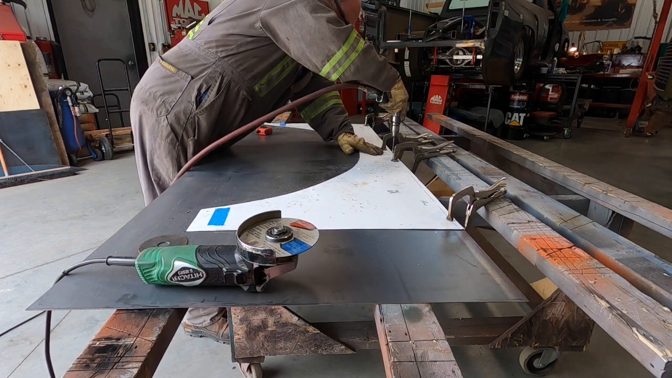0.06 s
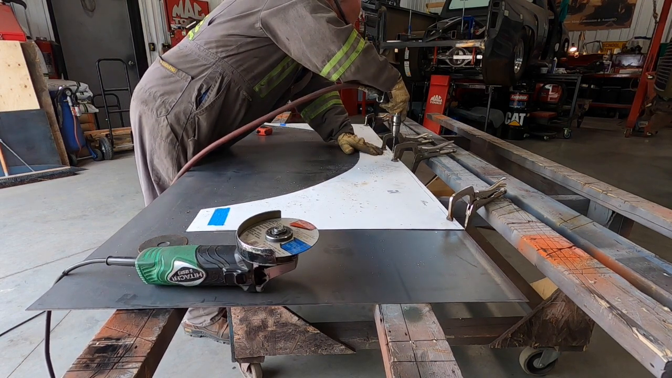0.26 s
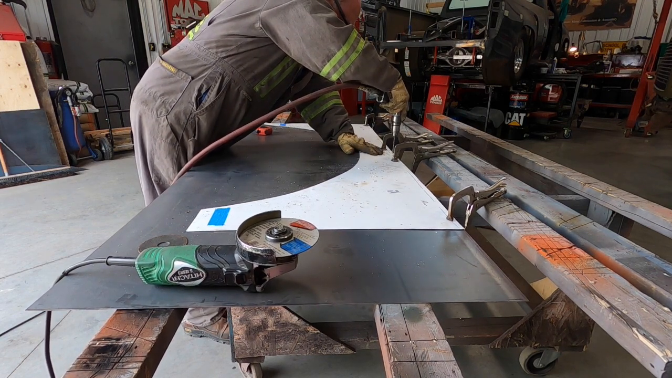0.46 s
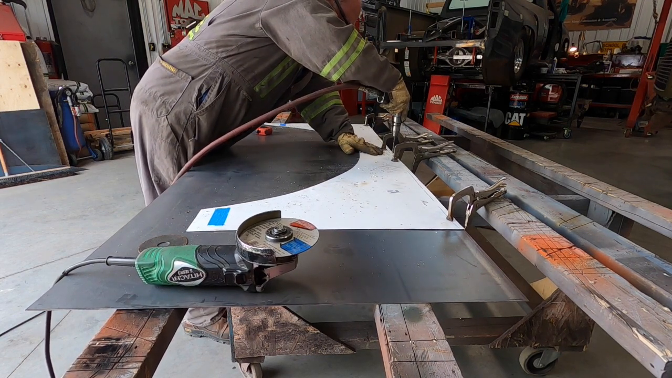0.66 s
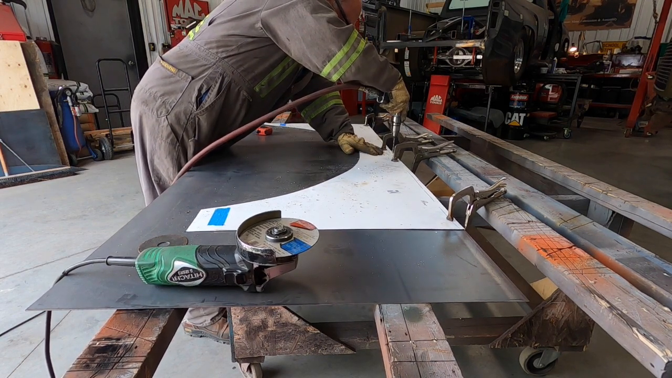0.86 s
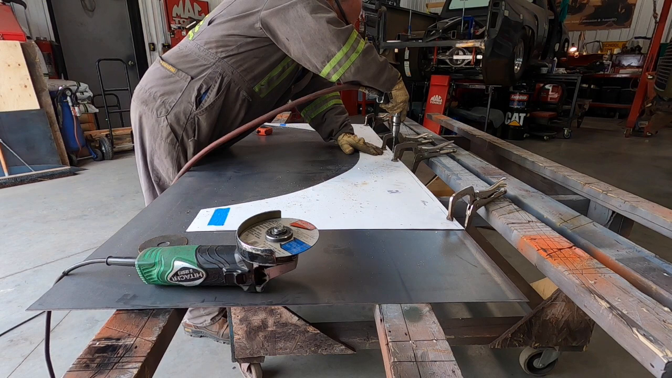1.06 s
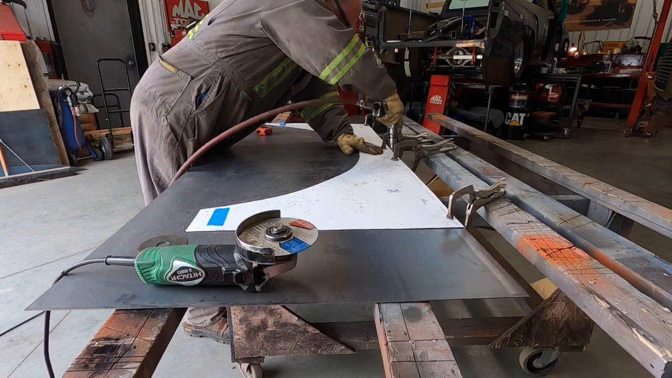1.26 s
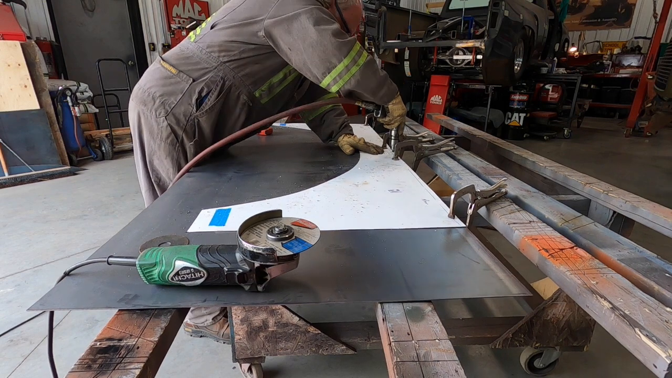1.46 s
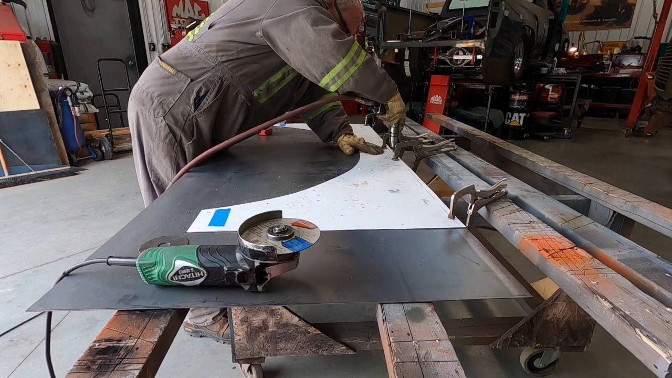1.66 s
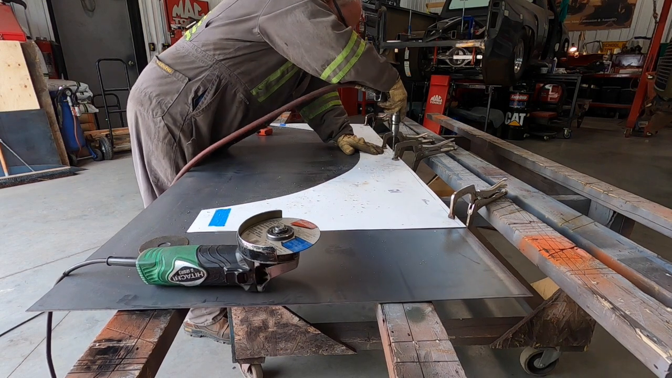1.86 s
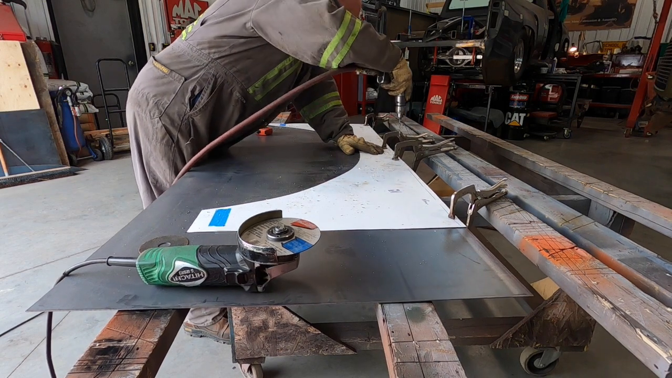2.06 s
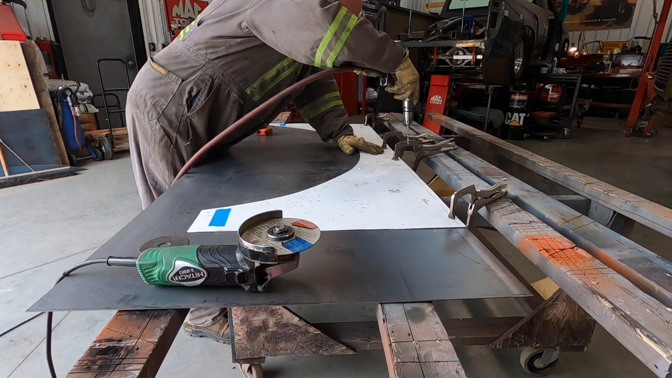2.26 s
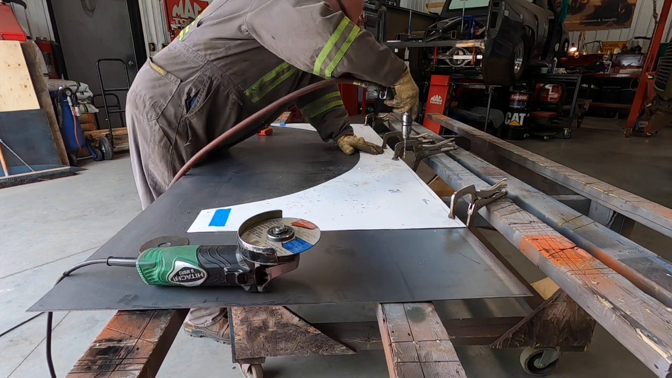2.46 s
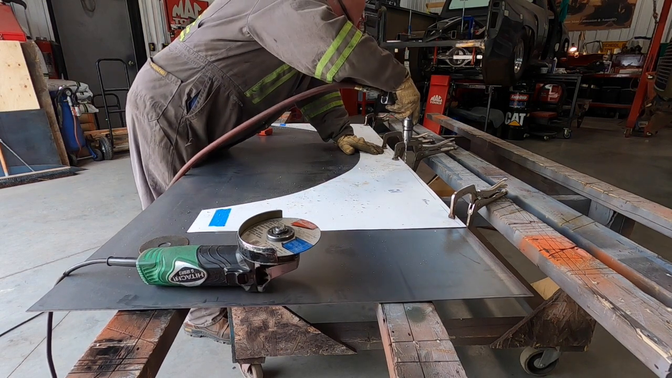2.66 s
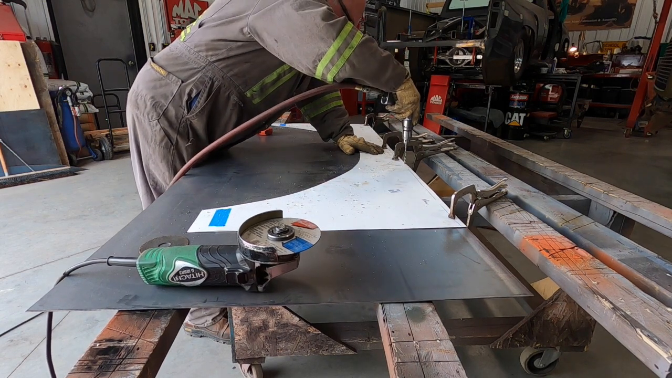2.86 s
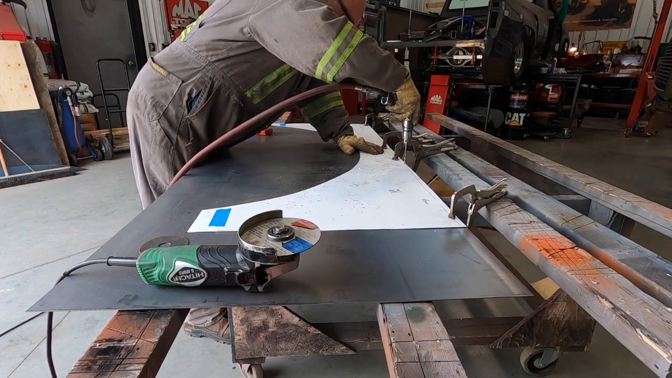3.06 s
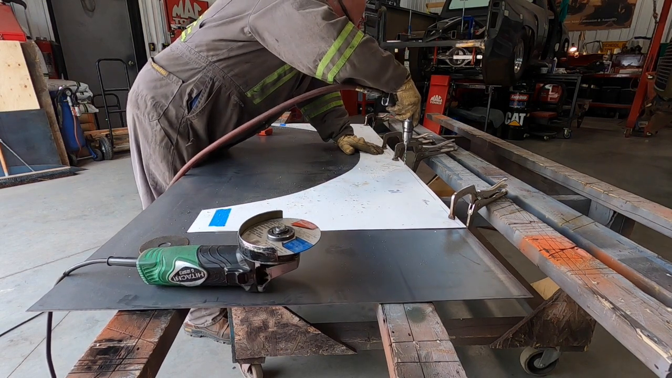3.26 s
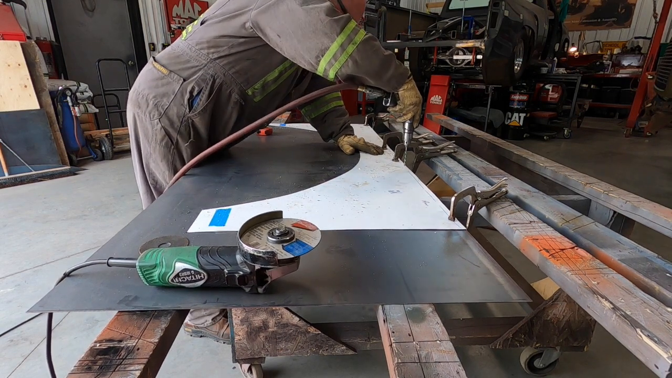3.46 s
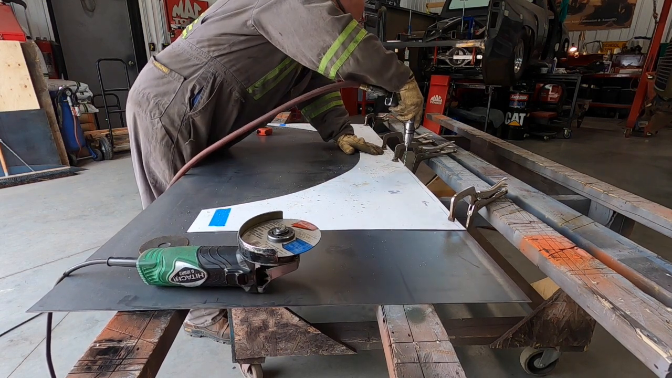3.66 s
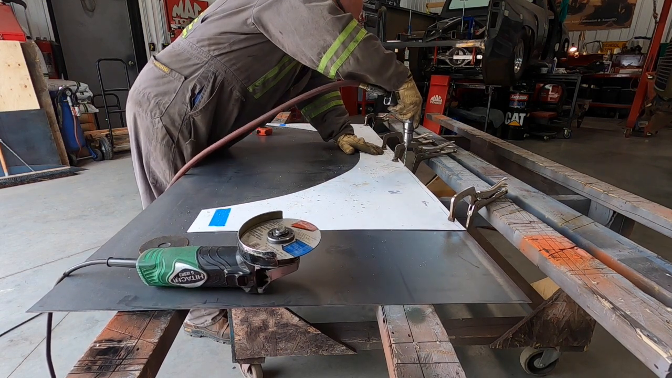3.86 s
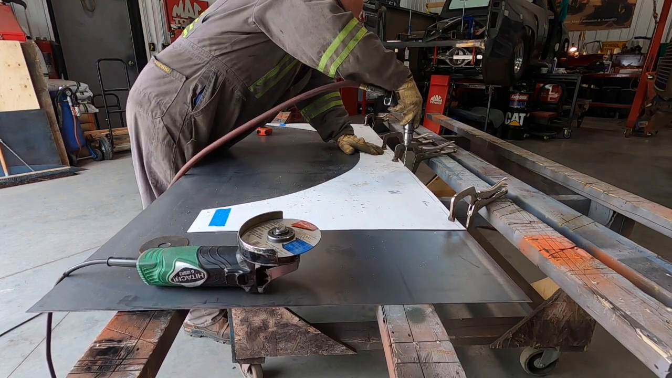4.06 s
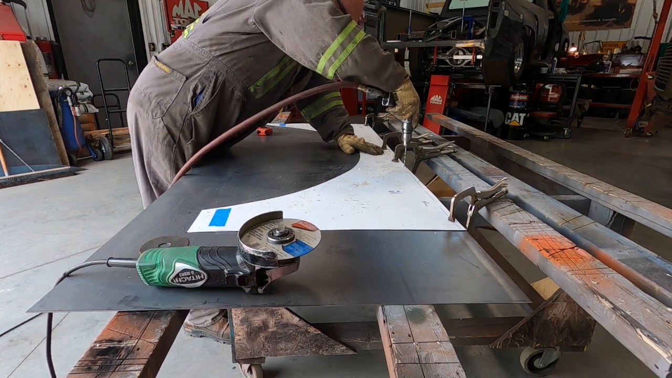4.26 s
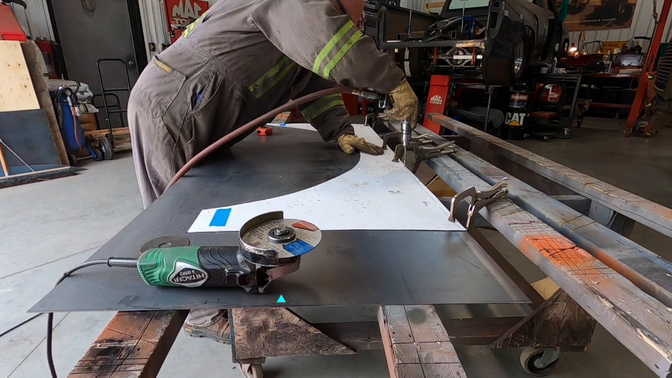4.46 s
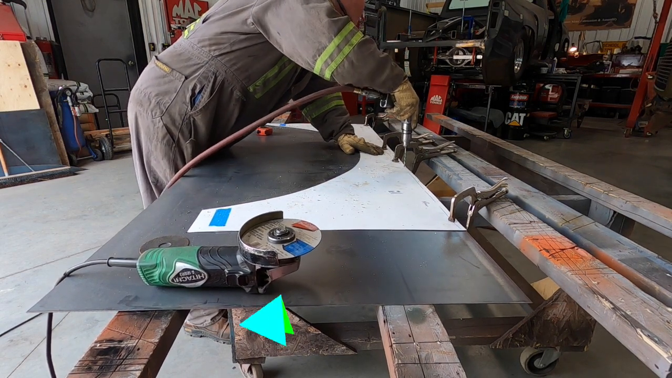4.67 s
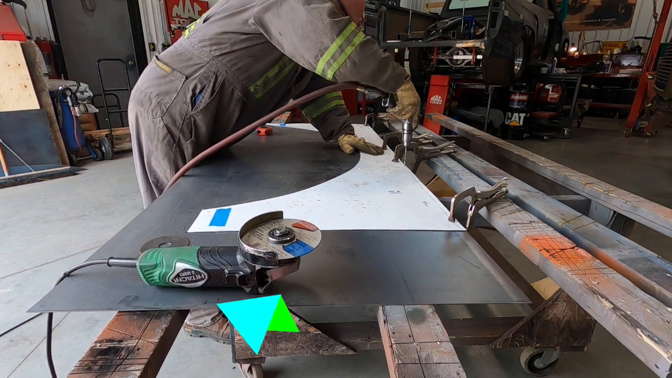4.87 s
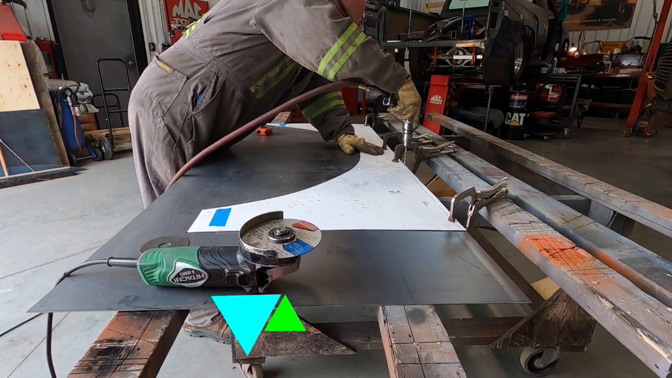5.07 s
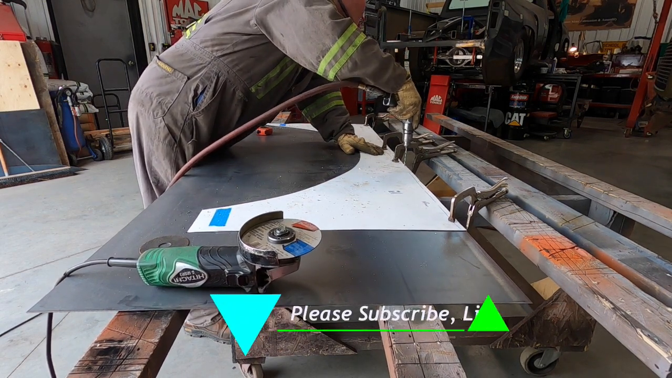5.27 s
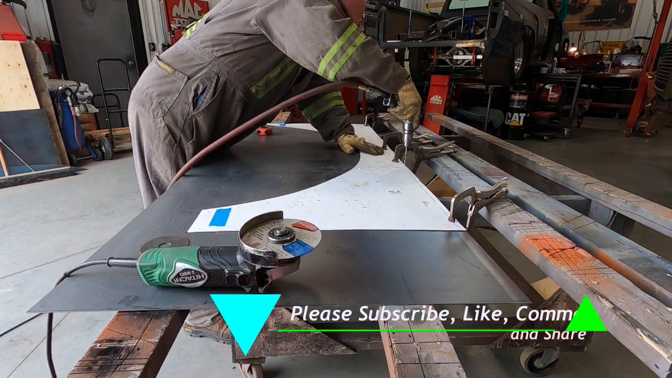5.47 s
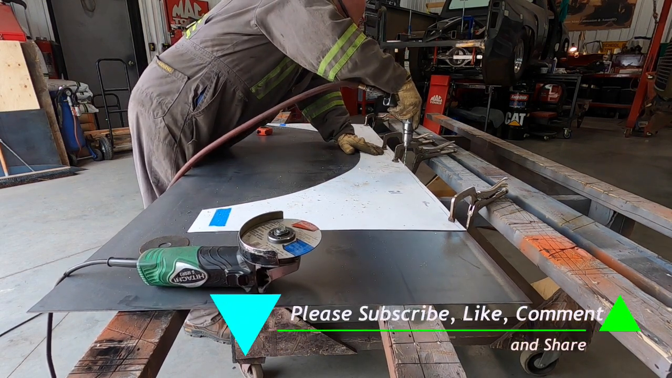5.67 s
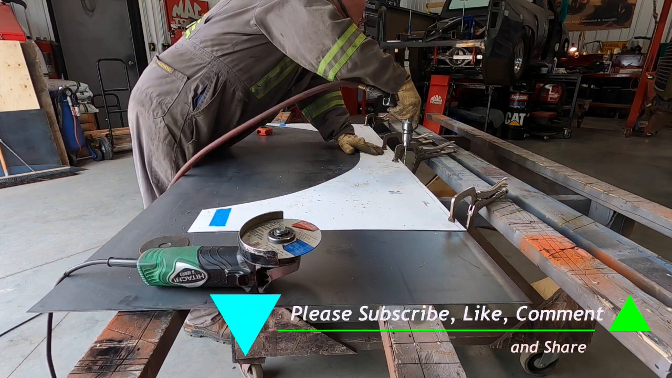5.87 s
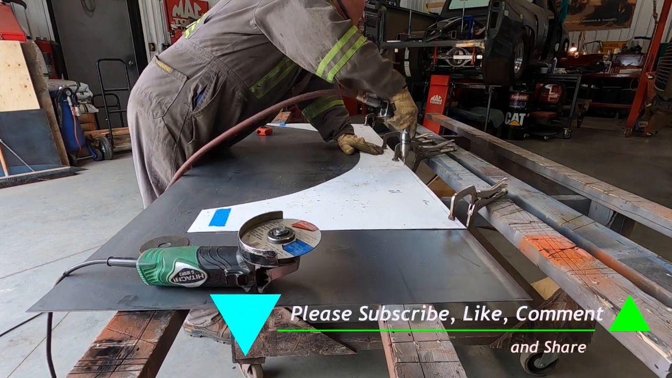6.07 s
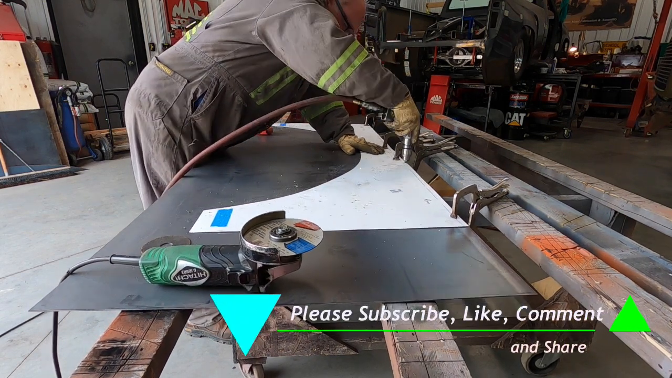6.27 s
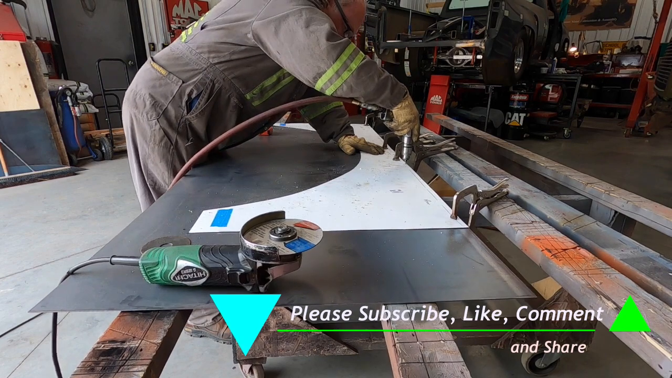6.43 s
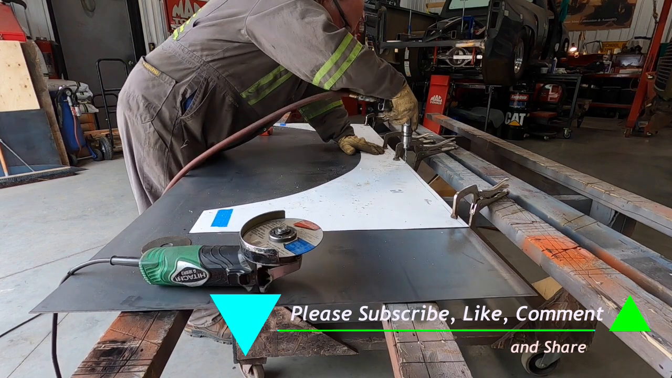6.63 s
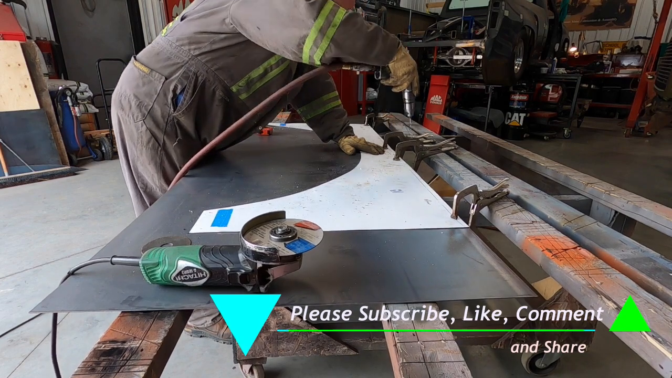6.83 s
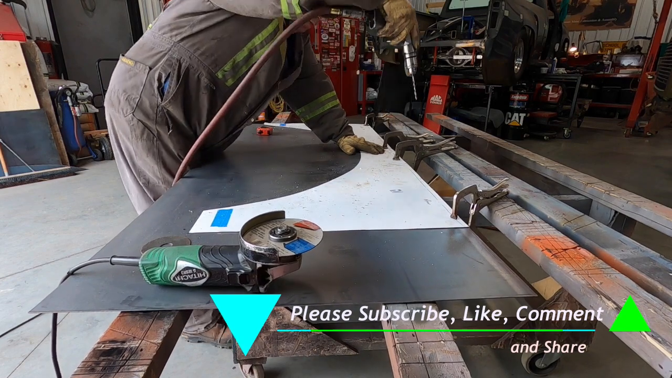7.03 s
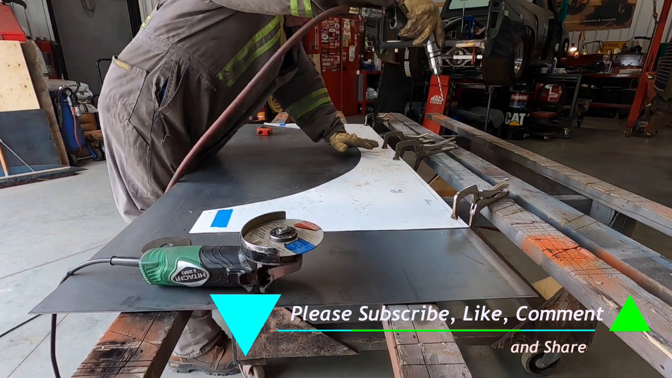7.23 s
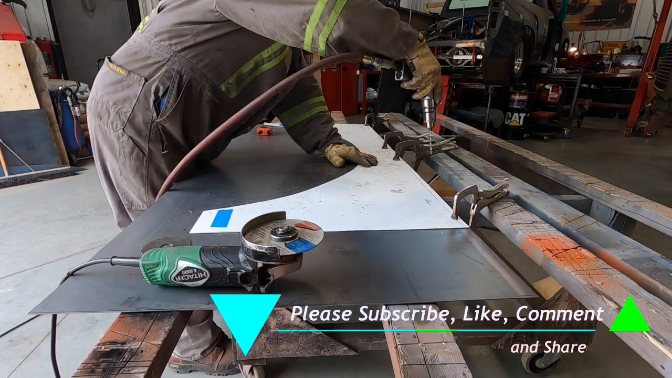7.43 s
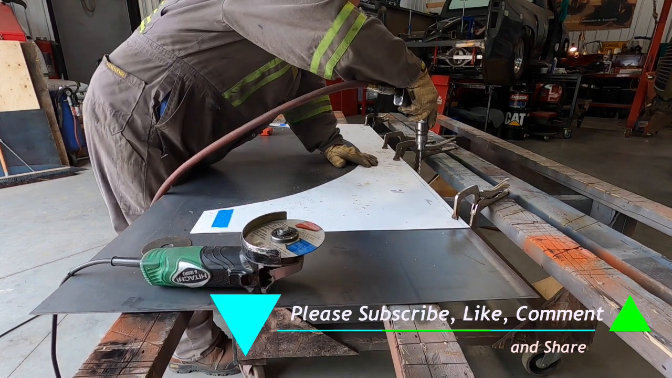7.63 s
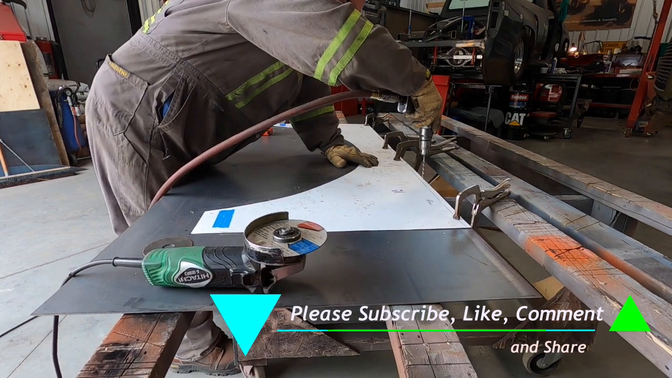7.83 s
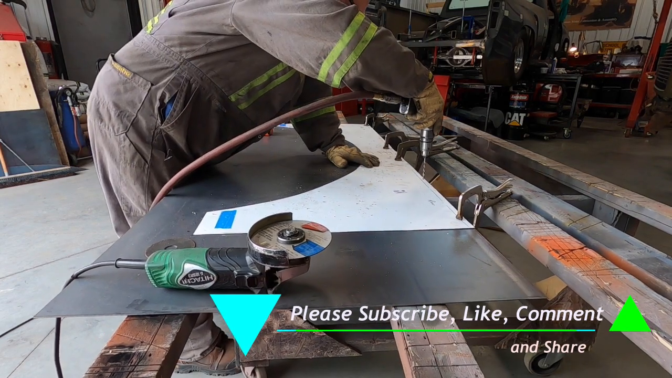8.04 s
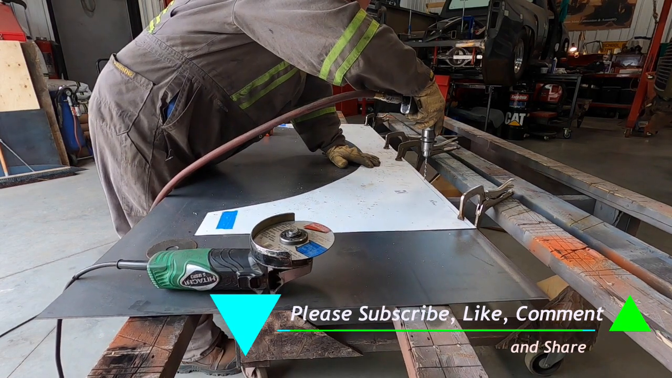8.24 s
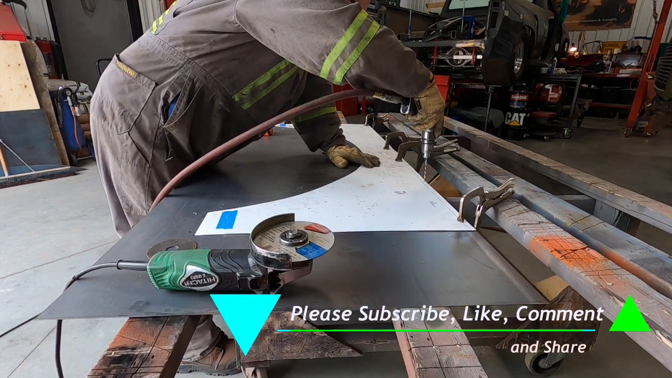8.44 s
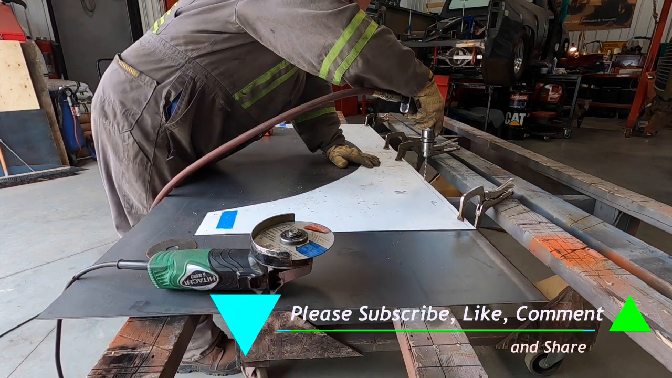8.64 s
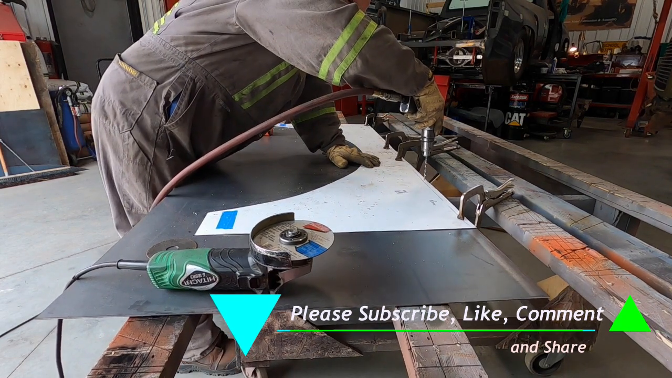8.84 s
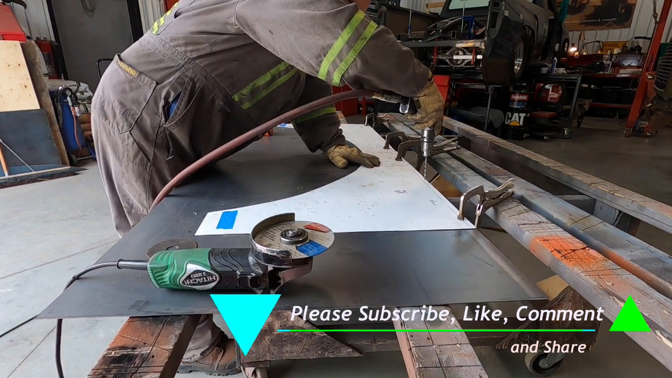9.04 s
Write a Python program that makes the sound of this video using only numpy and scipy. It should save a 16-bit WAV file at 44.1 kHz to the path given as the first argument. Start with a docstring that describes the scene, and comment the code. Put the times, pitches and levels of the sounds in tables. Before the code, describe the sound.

An air drill hisses and whines through sheet steel twice, with short blips, falling whoops and light metal knocks in a reverberant workshop.

```python
"""Air drill through sheet steel

An air drill bores two holes in a clamped steel sheet in a reverberant workshop, with short blips to
clear the bit. Exhaust air hisses over the vane motor's whine, the bit chatters as it breaks through,
and each release of the trigger whoops down as the vanes coast. Between and after the holes the tool
knocks on the work and the air hose drags over the sheet."""
import sys
import numpy as np
from scipy import signal
from scipy.fft import rfft, irfft, next_fast_len
from scipy.io import wavfile
from scipy.ndimage import map_coordinates

SR = 44100
rng = np.random.default_rng(int(sys.argv[2]) if len(sys.argv) > 2 else 0)


def unload_audio(sound):
    """Save the sound as a 16-bit wav file, at the path given as the first command line argument."""
    columns = np.transpose(np.atleast_2d(sound))
    # keep every value between -1 and 1, then stretch to whole-number steps
    steps = np.round(np.clip(columns, -1, 1) * 32767)
    wavfile.write(sys.argv[1], SR, steps.astype(np.int16))


N = 401310

# trigger pulls: (open [s], close [s], air trim [dB], whoop trim [dB], valve thump [dB],
# pose [row of JET_LOBES], starting kick trim [dB])
TRIGGER_PULLS = [(-.5, 1.58, 0.5, 4.5, -42, 0, 0), (1.805, 1.937, 1, 5.5, -35, 2, -4),
                 (4.002, 4.109, 1, 5.5, -33, 2, 4), (4.403, 6.378, -0.5, 4, -41, 1, -5),
                 (6.618, 6.74, 0, 4, -33, 2, -1)]
# colour of the exhaust hiss: (frequency [Hz], level [dB])
EXHAUST_SPECTRUM = [(25, -23), (70, -18), (220, -12.5), (450, -13), (720, -19.5), (1000, -12), (1950, -8.5),
                    (2350, 0), (3200, 0.5), (4400, -5), (7500, -5.5), (12000, -14.5), (14000, -21.5),
                    (15700, -33.5)]
# lobes of the jet, a row per pose of the drill (first hole, second hole, lifted, plunged through):
# (centre [Hz], width [Hz], gain [dB])
JET_LOBES = [
    [(1400, 180, 1.5), (1640, 56, 5), (3000, 190, 1.5), (3680, 110, 3), (4680, 910, -3.5), (5510, 190, 7.5),
     (6200, 460, 7), (7700, 300, -2), (8950, 680, 3), (10440, 470, -5.5), (10800, 130, 2)],
    [(1600, 71, 3), (2200, 270, 2.5), (4850, 300, 1), (5490, 300, 6.5), (6140, 304, 6.5), (7400, 350, 1),
     (7770, 97, 2.5), (8670, 410, 6), (9550, 150, -1.5), (10400, 330, 3)],
    [(1580, 150, 7), (2980, 94, 0), (4850, 200, -2.5), (6840, 2170, 3.5), (7720, 220, -0.5),
     (8800, 400, -0.5), (10500, 500, 0.5)],
    [(2490, 250, -5.5), (3520, 400, 1), (4440, 320, 2), (5840, 460, 1.5), (7300, 460, 3), (9800, 900, -1.5)],
]
# the broad plume of air against the jet: (frequency [Hz], gain [dB])
PLUME_EQ = [(500, -14.5), (2500, -14.5), (6000, -11.5), (13000, -7.5)]
# colour the motor housing gives the coasting vanes: (frequency [Hz], gain [dB])
HOUSING_EQ = [(60, -48.5), (140, -25.5), (225, -13), (320, -17), (480, -7.5), (650, -6.5), (930, -1),
              (1150, -1.5), (1350, -9), (1850, -8.5), (2350, 7.5), (2650, -15.5), (6000, -25.5)]
# holes: (bit bites [s], lips catch [s], breakthrough [s], speed lost to the feed [Hz], sag [Hz/s],
# quiet cut [dB], judder [dB], scrape [dB], easing of the chatter [dB/s])
DRILLED_HOLES = [(-1, 1.364, 1.426, 121, 23, -61.5, -20.5, -23.5, 80.5),
                 (4.5, 6.192, 6.241, 96, 61, -45, -19, -20.5, 26.5)]
# short knocks of the tool on the work, plus the rotor's brief starting blip at 3.98 s:
# (time [s], sheet boom [dB], clank [dB], tick [dB], drill ring [dB],
# seating blow trim [dB], rebound delay [s], rebound trim [dB])
KNOCK_CUES = [(2.008, -24, -22.5, -49.5, -48, -12, .03, -1), (3.473, -27.5, -29, -41, -61, -6, .061, -2),
              (3.984, -43.5, -32.5, -65.5, -61, -19, .02, -20),
              (7.288, -27, -31, -40.5, -39.5, -4, .049, -1.5),
              (8.241, -50, -50.5, -52, -74.5, -19, .03, -17), (8.408, -42, -58, -66, -70, -6, .04, -15),
              (8.511, -33, -30, -46, -55, 5, .033, 4.5), (8.921, -40, -40, -48.5, -63, 0.5, .03, 3)]
# make-up of a blow: (sheet boom [dB], clank [dB], tick [dB], drill ring [dB])
START_KICK = (-27.5, -35, -24, -17)
BREAKTHROUGH_SNAP = (-1, 3.5, -21.5, -17.5)  # relative to the hole's scrape
REBOUND_MIX = (-2.5, -17, 2.5, -7)  # relative to the first touch
# modes of the sheet, and of the chuck and drill body: (frequency [Hz], level [dB], t60 [s])
SHEET_MODES = [(42, -13.5, 0.25), (74.4, -7, 0.41), (98, -8, .15), (125.2, 1, 0.22), (144, -4.5, 0.2),
               (168, 2.5, 0.18), (187.3, -8, 0.5), (215.6, 3.5, 0.17), (243, -9.5, 0.57), (277.1, 3, 0.14),
               (342, -1, 0.053)]
DRILL_MODES = [(2320, -5, 0.033), (2470, 1.5, 0.033), (2890, -7, 0.084), (4200, -21, .06),
               (5800, -2, 0.044)]
# hose and sleeve sliding over the sheet: (start [s], length [s], rumble [dB], swish [dB])
HOSE_SLIDES = [(2.277, 0.194, -66, -63.5), (2.5, 0.15, -52.5, -72.5), (3.3, .68, -61, -71.5),
               (7.04, 0.84, -51.5, -55), (7.5, .07, -51, -52), (7.578, 0.089, -43.5, -68),
               (7.95, .42, -75, -70.5), (8.399, 0.43, -58, -62), (8.975, .1, -48.5, -81)]
# colours of the cut, the blows, the hose and the room tone: (frequency [Hz], level [dB])
SCRAPE_SPECTRUM = [(100, -10), (400, 6), (1000, 3), (1650, 6), (2300, 1), (4000, -10), (7500, -21),
                   (14000, -33.5)]
CLANK_SPECTRUM = [(100, 0), (380, -3.5), (550, 0.5), (900, -1), (1400, 0.5), (1900, -2.5), (2700, -12.5),
                  (5000, -21.5), (15000, -43)]
TICK_SPECTRUM = [(500, -29.5), (2000, 7.5), (3500, 3.5), (6000, -4), (10000, -15.5), (15000, -31)]
SWISH_SPECTRUM = [(200, 1), (700, 0), (1500, 3), (3000, -4), (5000, -9), (8000, -9), (11000, -22),
                  (15000, -42)]
ROOM_TONE_SPECTRUM = [(12, -40.5), (20, -11.5), (92, -6.5), (108, -21), (139, -5.5), (151, -23),
                      (256, -25.5), (302, -28), (433, -27.5), (511, -25), (693, -31), (1110, -18.5),
                      (1880, -26.5), (4080, -45), (15000, -70)]
# the drill's stereo balance: (frequency [Hz], left minus right [dB])
PAN_BALANCE = [(100, -.5), (280, -2.2), (800, -5), (2000, 0), (4200, -1.5), (6400, -4.5), (9800, -11),
               (15000, -8)]
# the drill's stereo timing: (frequency [Hz], lead of the left side [rad])
PAN_PHASE = [(100, 0), (2800, -.15), (5200, -1.3), (7800, -2.3), (8800, -1.2), (13000, -2.3)]
# width of the diffuse sound: (frequency [Hz], left-right correlation [0 to 1])
COHERENCE = [(40, .88), (200, .96), (1400, .84), (3000, .5), (6000, 0)]
# decay of the workshop: (frequency [Hz], t60 [s])
REVERB_T60 = [(100, 1.1), (300, 0.94), (900, 1.25), (2500, 1.09), (5000, 0.85), (8000, 0.41), (14000, .36)]
# colour of its reverb: (frequency [Hz], gain [dB])
REVERB_EQ = [(100, -2.5), (900, 0), (2700, -5.5), (6000, -9.5), (14000, -6.5)]

FREE_HZ = 1534  # vane rate with no load
PORT_HZ, PORT_WIDTH_HZ = 1363, 35  # resonance of the exhaust port
SETTLE_S, RELIEF_S = .2, .2  # the load builds after the bite and lets go once the bit is through
GRAB_HZ, GRAB_S = 89.4, .14  # extra drag as the last skin of steel gives way
SEAT_S = .007  # the tip touches first, then the tool's weight follows
TOP_HZ = 15750


def exhaust(vane_hz, judder, air_db=-22.5, vanes_per_turn=41, plunge_db=-36):
    """Hiss puffs with each vane and sways with each chuck turn; rows: the jet, two sides of its plume."""
    air = noise(EXHAUST_SPECTRUM, (3, N))
    poses = [filtered(air, lambda hz: jet_colour(lobes, hz)) for lobes in JET_LOBES]
    # as the bit breaks through, the drill drops toward the sheet and the jet changes colour
    plunge = 1 - np.exp(-(judder / amp(plunge_db)) ** 2)
    hiss = sum(amp(db) * valve(on, off) * ((1 - plunge) * poses[round(pose)] + plunge * poses[-1])
               for on, off, db, _, _, pose, _ in TRIGGER_PULLS)
    phase = 2 * np.pi * np.cumsum(vane_hz) / SR
    puffs = 1 + 0.16 * np.cos(phase)
    sway_db = 0.13 * np.sin(phase / vanes_per_turn) + 0.48 * wobble(21) + .5 * wobble(130)
    return hiss * puffs * amp(air_db + sway_db)


def jet_colour(lobes, hz):
    """The jet's lobes in one pose, as a gain curve of bell-shaped peaks and dips."""
    return amp(sum(db * np.exp(-.5 * ((hz - centre) / width) ** 2) for centre, width, db in lobes))


def valve(on, off, opening_s=0.0029, closing_s=0.0074, leak=0.0056, lead_s=0.044):
    """Air flow of one pull: a brief leak, a quick rise, then the chamber empties."""
    t = np.arange(N) / SR
    step = lambda s: .5 + .5 * np.tanh((t - s) / (2 * opening_s))
    return (leak * step(on - lead_s) + (1 - leak) * step(on)) * decay(t - off, closing_s)


def motor_whine(vane_hz, judder, tone_db=-36, overtone_db=-7, choke_db=-33, port_db=2.0):
    """A thin wavering tone swells as the load pulls it onto the port's resonance; chatter chokes it."""
    flow = sum(valve(on, off) for on, off, *_ in TRIGGER_PULLS)
    at_speed = np.minimum(vane_hz / (.88 * FREE_HZ), 1) ** 6
    resonance_db = port_db / (1 + ((vane_hz - PORT_HZ) / PORT_WIDTH_HZ) ** 2)
    waver_db = .7 * wobble(4) + .6 * wobble(30)
    phase = 2 * np.pi * np.cumsum(vane_hz) / SR
    tone = np.sin(phase) + amp(overtone_db) * np.sin(2 * phase)
    choke = 1 + judder / amp(choke_db)
    return flow * at_speed * tone * amp(tone_db + resonance_db + waver_db) / choke


def rotor_runs(spin_up_s=.022, coast_s=.055, flutter=0.00096):
    """Vane rate in Hz for each pull: it races up under air, slows under load, runs down by friction."""
    t = np.arange(N) / SR
    driven_hz = (FREE_HZ - load_hz()) * (1 + flutter * wobble(45))
    runs = []
    for on, off, *_ in TRIGGER_PULLS:
        held_hz = np.interp(np.minimum(t, off), t, driven_hz)
        runs.append(held_hz * (1 - decay(t - on, spin_up_s)) * decay(t - off, coast_s))
    return runs


def load_hz():
    """Speed lost to the work: the feed settles, the cut deepens, the bit grabs and is through."""
    t, lost = np.arange(N) / SR, np.zeros(N)
    for bite, _, through, feed_hz, sag, *_ in DRILLED_HOLES:
        cut_s = np.clip(t, bite, through) - bite
        grab = GRAB_HZ * decay(through - t, GRAB_S)
        drag = feed_hz * (1 - decay(cut_s, SETTLE_S)) + sag * cut_s + grab
        stop = min(off for _, off, *_ in TRIGGER_PULLS if off > through)
        lost += drag * decay(t - through, RELIEF_S) * (t < stop + .1)
    return lost


def coasting_whoop(runs, coast_db=-17, overtone_db=-12, thump_hz=62, thump_s=0.013):
    """The valve shuts with a soft thump and the free vanes pump like a falling siren."""
    out, t = np.zeros(N), np.arange(N) / SR
    for run_hz, (_, off, _, whoop_db, thump_db, *_) in zip(runs, TRIGGER_PULLS):
        after = (t > off) & (t < off + .4)
        age, hz = t[after] - off, run_hz[after]
        phase = 2 * np.pi * np.cumsum(hz) / SR
        fundamental = amp(along(HOUSING_EQ, hz)) * np.sin(phase)
        # the overtone needs speed: it is gone long before the fundamental
        overtone = amp(overtone_db + along(HOUSING_EQ, 2 * hz)) * (hz / 1150) ** 3 * np.sin(2 * phase)
        siren = (fundamental + overtone) * (1 - decay(age, 0.0075)) * hz / (hz + 30)
        thump = (age / thump_s) ** 2 * np.exp(2 - 2 * age / thump_s) * np.sin(2 * np.pi * thump_hz * age)
        out[after] += amp(coast_db + whoop_db) * siren + amp(thump_db) * thump
    return out


def cutting_gains(vane_hz, build_db=11, engage_s=0.44, catch_s=.006):
    """A quiet cut, then judder and scrape build to the breakthrough, ease and stop with the rotor."""
    t = np.arange(N) / SR
    judder, scrape = np.zeros((2, N))
    for bite, catch, through, _, _, cut_db, judder_db, scrape_db, easing in DRILLED_HOLES:
        cut = amp(cut_db) * ramp(t - bite, engage_s) * (t < through)
        swell_db = -build_db * ramp(through - t, through - catch) - easing * np.maximum(t - through, 0)
        withdrawn = min(on for on, *_ in TRIGGER_PULLS if on > through)
        caught = amp(swell_db) * ramp(t - catch, catch_s) * (t < withdrawn)
        judder += cut + amp(judder_db) * caught
        scrape += cut + amp(scrape_db) * caught
    return judder * vane_hz / FREE_HZ, scrape * np.sqrt(vane_hz / FREE_HZ)


def bit_chatter(judder, scrape, slip_hz=115, scatter=.12, boom_db=-2, scrape_db=-2, grit_s=0.02):
    """The cutting lips stick and slip: each slip kicks the sheet and tears a burr."""
    slip_count = np.floor(np.cumsum(slip_hz * (1 + scatter * wobble(60))) / SR)
    slips = np.diff(slip_count, prepend=0) * amp(2 * rng.standard_normal(N))
    boom = amp(boom_db) * judder * sheet_drone(slips)
    tearing = unit(signal.lfilter([1], [1, -np.exp(-1 / (grit_s * SR))], slips))
    return boom + amp(scrape_db) * scrape * tearing * noise(SCRAPE_SPECTRUM, N)


def knocks(clank_t60=0.12, tick_t60=0.034, contact_s=0.00062):
    """Each blow booms in the sheet, clanks in its dense upper modes, ticks and rings the drill."""
    out, t = np.zeros(N), np.arange(SR // 2) / SR
    for s, (boom_db, clank_db, tick_db, ring_db) in blows():
        clank = amp(clank_db - 60 * t / clank_t60) * noise(CLANK_SPECTRUM, len(t))
        tick = amp(tick_db - 60 * t / tick_t60) * noise(TICK_SPECTRUM, len(t))
        ring = sum(mode(t, hz, ring_db + db + rng.normal(0, 1.1), t60) for hz, db, t60 in DRILL_MODES)
        boom = amp(boom_db - 11) * sheet_ring()
        add(out, s, (boom + clank + tick + ring) * (1 - decay(t, contact_s)))
    return out


def blows():
    """Cues (time [s], four levels [dB]): motor kicks, snaps, and knocks that hit, seat and rebound."""
    cues = [(on + .003, np.add(START_KICK, kick_db)) for on, *_, kick_db in TRIGGER_PULLS if on > 0]
    for _, _, through, *_, scrape_db, _ in DRILLED_HOLES:
        cues.append((through, np.add(BREAKTHROUGH_SNAP, scrape_db)))
    for s, *levels, seat_db, rebound_s, rebound_db in KNOCK_CUES:
        cues += [(s, levels),
                 (s + SEAT_S, np.add(levels, seat_db)),
                 (s + rebound_s, np.add(levels, REBOUND_MIX) + rebound_db)]
    return cues


def sheet_ring():
    """The sheet's answer to one blow; the modes' strengths depend on the spot."""
    t = np.arange(SR // 2) / SR
    ring = sum(mode(t, hz, db + rng.normal(0, 3.6), t60) * rng.choice([-1, 1])
               for hz, db, t60 in SHEET_MODES)
    return ring / np.std(ring[:SR // 20])


def sheet_drone(force, spots=12):
    """The sheet under a running force, at rms 1: successive pushes land on different spots."""
    spot = rng.integers(spots, size=N)
    return unit(sum(signal.oaconvolve(force * (spot == k), sheet_ring())[:N] for k in range(spots)))


def sheet_shudder(shudder_db=-14, swell_s=0.039):
    """After each knock cue the sheet goes on trembling on its supports."""
    t, envelope = np.arange(N) / SR, np.zeros(N)
    for s, boom_db, *_ in KNOCK_CUES:
        age = np.maximum(t - s, 0) / swell_s
        envelope += amp(boom_db + shudder_db) * age * np.exp(1 - age)
    return envelope * sheet_drone(rng.standard_normal(N))


def hose_drag(snag_db=2.5, attack_s=.05, release_s=0.034):
    """Each slide swells, holds and dies; uneven rubbing swishes, snags and sets the sheet rumbling."""
    t = np.arange(N) / SR
    rumble, swish = np.zeros((2, N))
    for s, length, rumble_db, swish_db in HOSE_SLIDES:
        stroke = ramp(t - s, attack_s) * decay(t - s - length, release_s)
        rumble += amp(rumble_db) * stroke
        swish += amp(swish_db) * stroke
    rubbing = unit(amp(1.4 * wobble(30) + snag_db * wobble(250)) * noise(SWISH_SPECTRUM, N))
    return rumble * amp(1.3 * wobble(25)) * sheet_drone(rng.standard_normal(N)) + swish * rubbing


def workshop_reverb(x, build_up_s=0.004, steps=36):
    """A tail that dies faster in the treble and shifts as the worker moves."""
    hz, t, spectra = signal.stft(rng.standard_normal((steps + 1, 2, SR)), SR, nperseg=256)
    fade = amp(-60 * t / along(REVERB_T60, hz)[:, None]) * (1 - decay(t, build_up_s))
    energy = np.sum(fade ** 2, axis=1, keepdims=True) * t[1] * SR
    fade *= amp(along(REVERB_EQ, hz))[:, None] / np.sqrt(energy)
    tails = signal.istft(spectra * fade, SR, nperseg=256)[1]
    hop = N // steps + 1
    padded = np.pad(x, (hop, 2 * hop))
    crossfade = np.sin(np.pi * np.arange(2 * hop) / (2 * hop))
    out = np.zeros((2, 2 * N))
    for k, tail in enumerate(tails):
        stretch = padded[k * hop:][:2 * hop] * crossfade
        wet = signal.fftconvolve(stretch[None], tail, axes=1)
        out[:, k * hop:k * hop + wet.shape[1]] += wet
    return diffuse(out[:, hop:hop + N])


def room_tone(level_db=-61):
    """The workshop's faint low rumble, drifting in level."""
    return amp(level_db + wobble(2.7)) * diffuse(noise(ROOM_TONE_SPECTRUM, (2, N)))


def pan_right(x):
    """The work lies a little to the right: the left side hears it later and duller."""
    def response(hz):
        left = amp(along(PAN_BALANCE, hz) / 2) * np.exp(.5j * along(PAN_PHASE, hz))
        return np.array([left, 1 / left]) / np.sqrt(np.cosh(2 * np.log(abs(left))))  # constant power
    return filtered(x, response)


def diffuse(pair):
    """Two unrelated signals become a field that is narrow in the bass and wide in the treble."""
    angle = lambda hz: np.arccos(np.clip(along(COHERENCE, hz), -1, 1)) / 2
    mid, side = filtered(pair, lambda hz: np.array([np.cos(angle(hz)), np.sin(angle(hz))]))
    return np.array([mid + side, mid - side])


def amp(db):
    """Decibels to gain."""
    return 10 ** (np.asarray(db) / 20)


def unit(x):
    """Scale to rms 1."""
    return x / np.sqrt(np.mean(x ** 2) + 1e-20)


def ramp(age, rise_s):
    """A linear fade from 0 to 1."""
    return np.clip(age / rise_s, 0, 1)


def decay(age, tau_s):
    """Holds at 1 until age 0, then dies exponentially."""
    return np.exp(-np.maximum(age, 0) / tau_s)


def mode(t, hz, db, t60):
    """One ringing, dying sine."""
    return amp(db - 60 * t / t60) * np.sin(2 * np.pi * hz * t)


def along(points, hz):
    """Read (frequency [Hz], value) points on a log axis."""
    knots_hz, values = np.transpose(points)
    return np.interp(np.log(hz + 1), np.log(knots_hz + 1), values)


def wobble(rate):
    """A smooth random curve, rate knots a second."""
    return map_coordinates(rng.standard_normal(int(N * rate / SR) + 4), [np.arange(N) * rate / SR])


def filtered(x, response):
    """Shape x with a frequency response."""
    n = x.shape[-1]
    size = next_fast_len(n + SR // 4)
    return irfft(rfft(x, size) * response(np.fft.rfftfreq(size, 1 / SR)), size)[..., :n]


def noise(spectrum, size):
    """Coloured noise of rms 1."""
    return unit(filtered(rng.standard_normal(size), lambda hz: amp(along(spectrum, hz))))


def add(track, s, sound):
    """Mix a sound in at s seconds."""
    part = track[round(s * SR):][:len(sound)]
    part += sound[:len(part)]


def scene(whine_send_db=-7, whoop_send_db=-5, wall_s=.025, wall_db=-13):
    """Drill, sheet and hose in the workshop, over a bed of room tone."""
    runs = rotor_runs()
    vane_hz = sum(runs)
    judder, scrape = cutting_gains(vane_hz)
    air = exhaust(vane_hz, judder)
    plume = diffuse(filtered(air[1:], lambda hz: amp(along(PLUME_EQ, hz))))
    work = air[0] + bit_chatter(judder, scrape) + knocks() + sheet_shudder() + hose_drag()
    whine, whoop = motor_whine(vane_hz, judder), coasting_whoop(runs)
    # the fast fall in pitch lets one wall echo stand clear of the whoop
    slap = amp(wall_db) * np.pad(whoop, (round(wall_s * SR), 0))[:N]
    reverb = workshop_reverb(work + amp(whine_send_db) * whine + amp(whoop_send_db) * whoop)
    return pan_right(work + whine + whoop + slap) + plume + reverb + room_tone()


def record(dry):
    """A brick-wall low-pass takes off the very top."""
    return filtered(dry, lambda hz: hz < TOP_HZ)


dry = scene()
out = record(dry)
unload_audio(out)
```